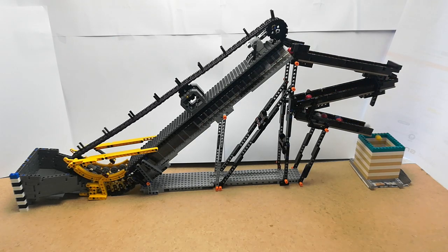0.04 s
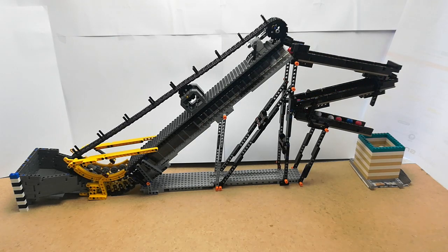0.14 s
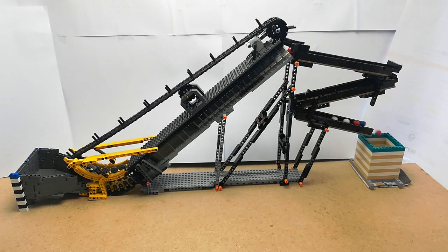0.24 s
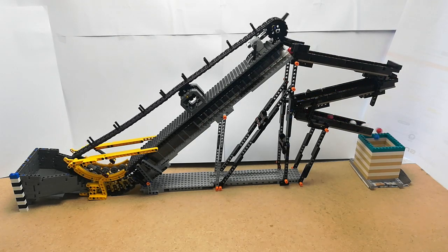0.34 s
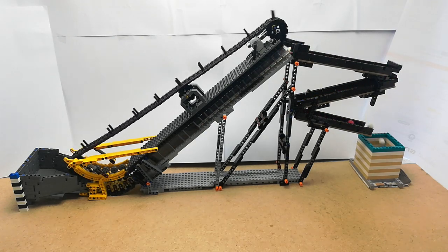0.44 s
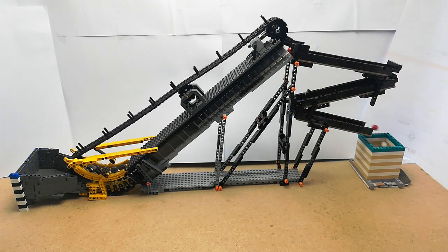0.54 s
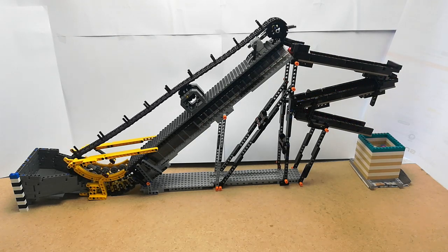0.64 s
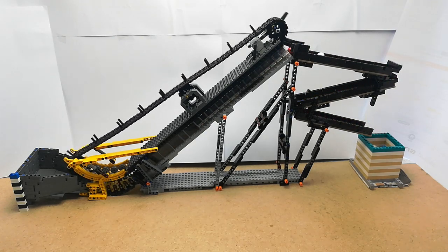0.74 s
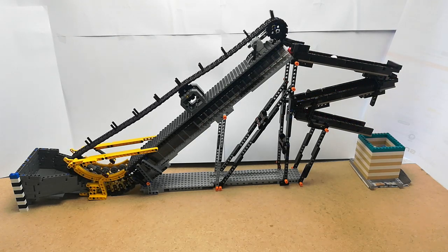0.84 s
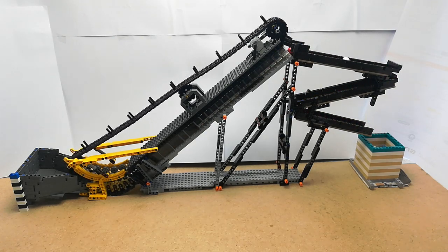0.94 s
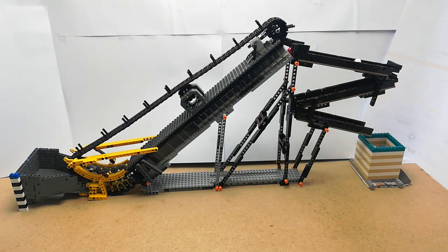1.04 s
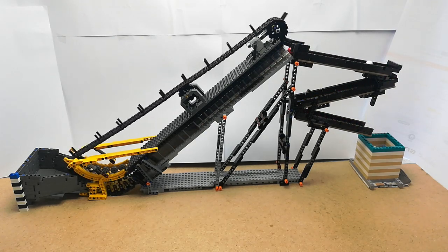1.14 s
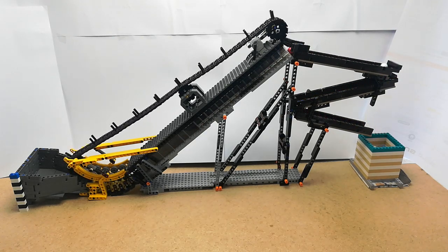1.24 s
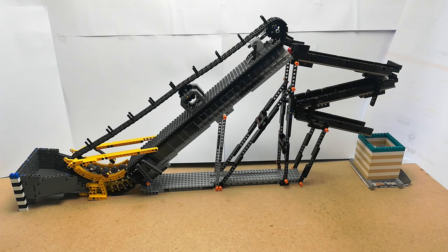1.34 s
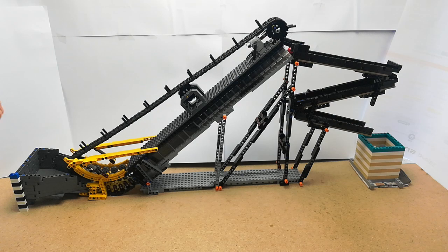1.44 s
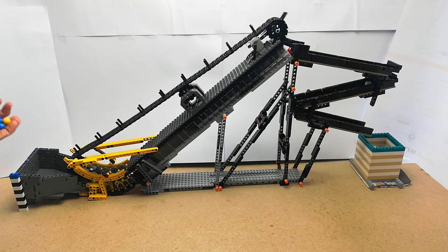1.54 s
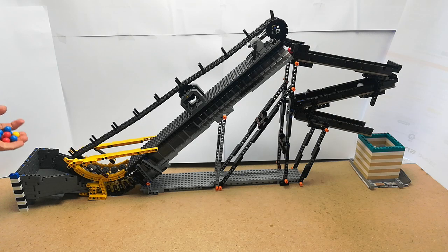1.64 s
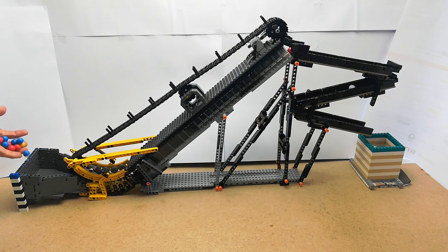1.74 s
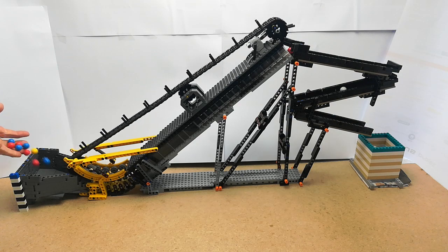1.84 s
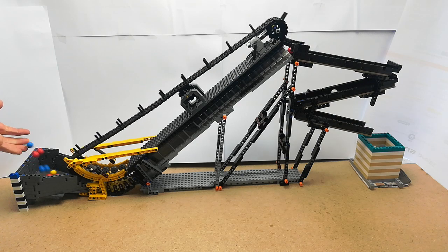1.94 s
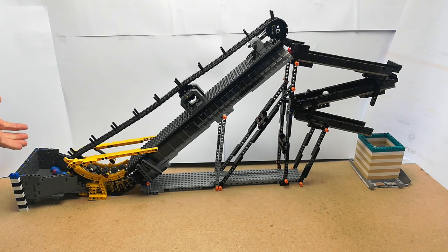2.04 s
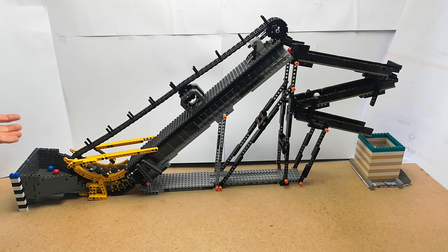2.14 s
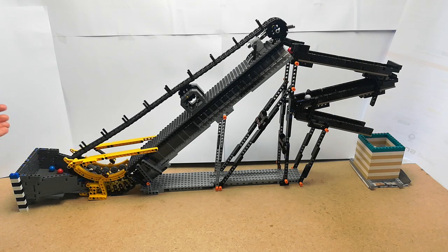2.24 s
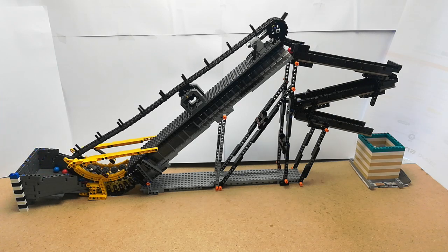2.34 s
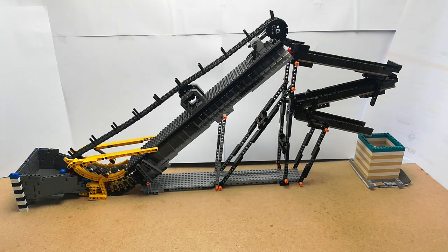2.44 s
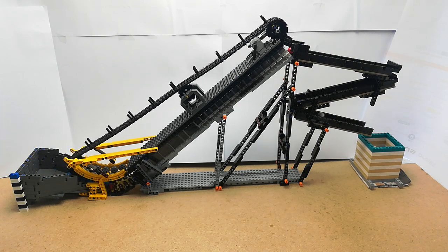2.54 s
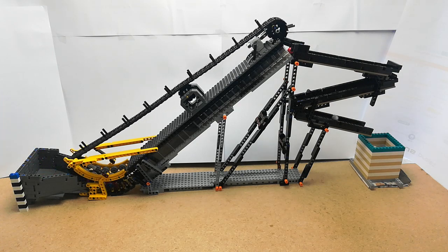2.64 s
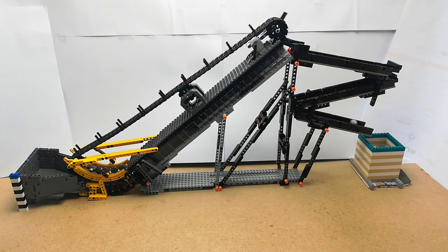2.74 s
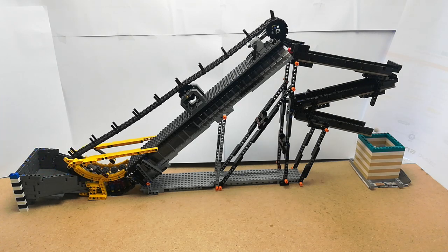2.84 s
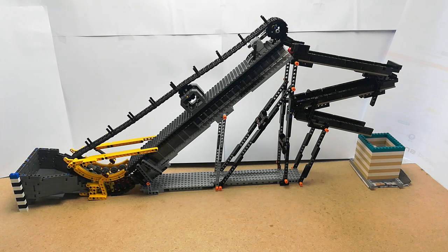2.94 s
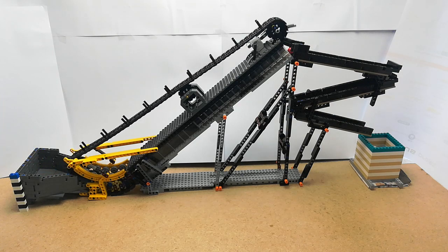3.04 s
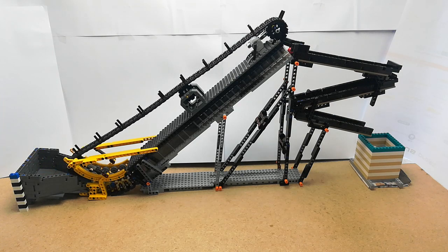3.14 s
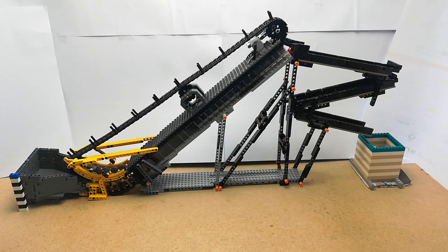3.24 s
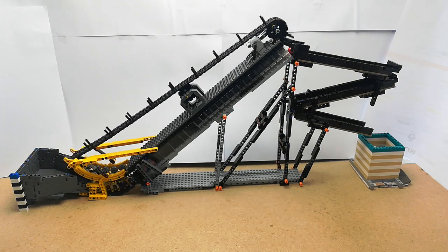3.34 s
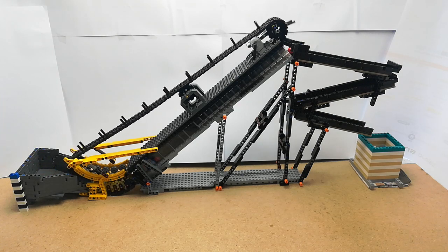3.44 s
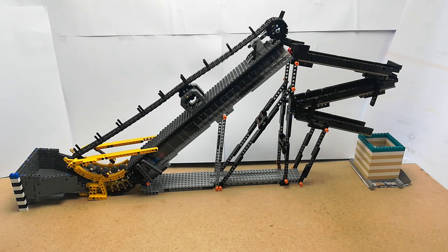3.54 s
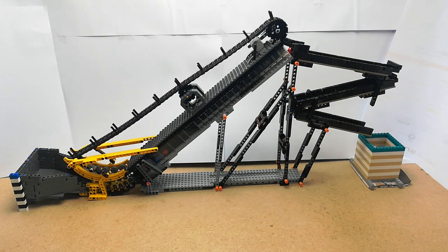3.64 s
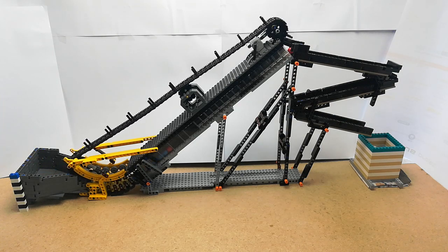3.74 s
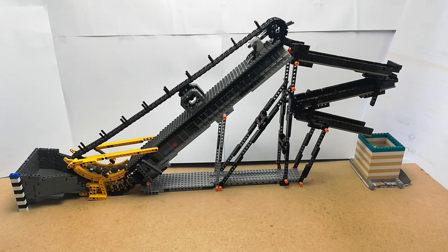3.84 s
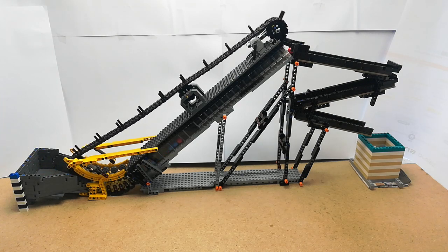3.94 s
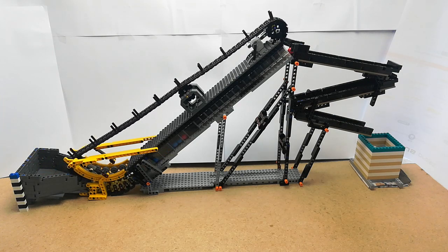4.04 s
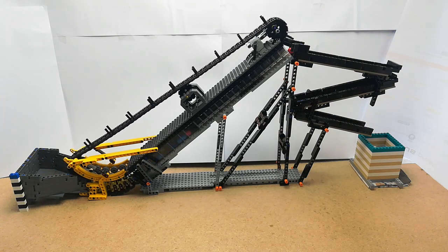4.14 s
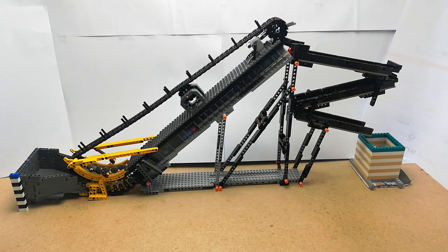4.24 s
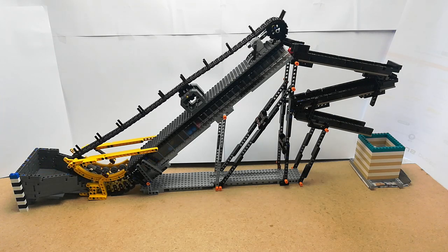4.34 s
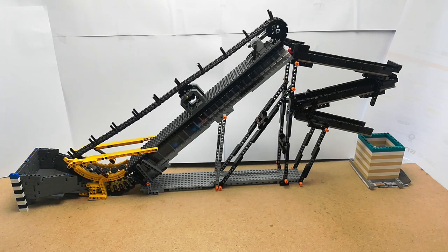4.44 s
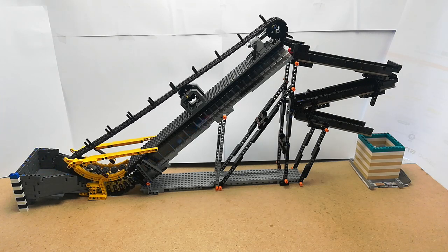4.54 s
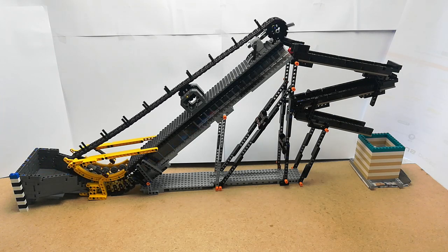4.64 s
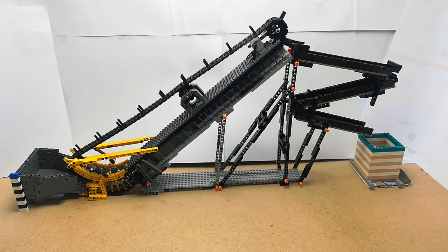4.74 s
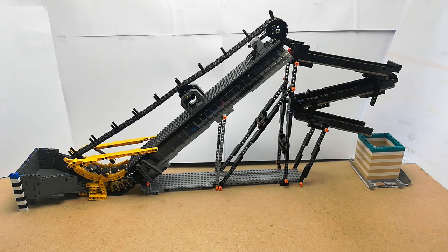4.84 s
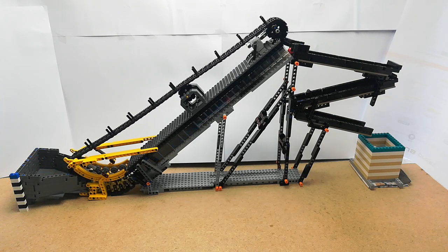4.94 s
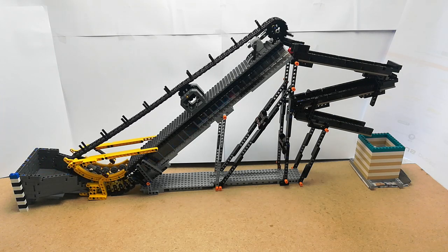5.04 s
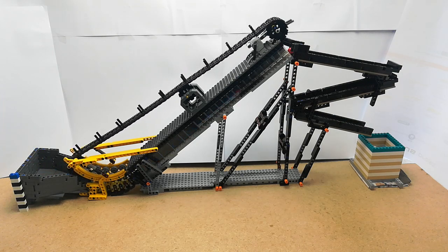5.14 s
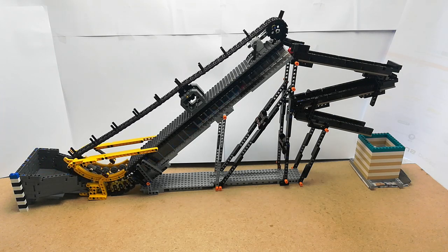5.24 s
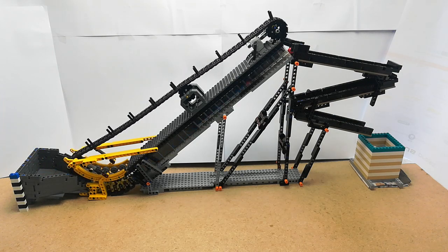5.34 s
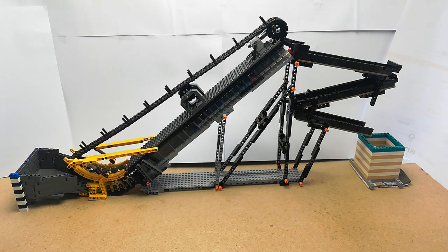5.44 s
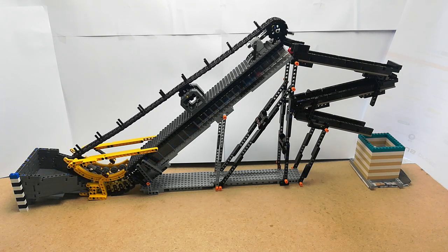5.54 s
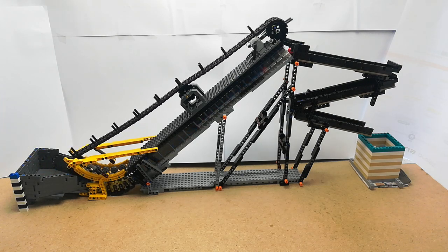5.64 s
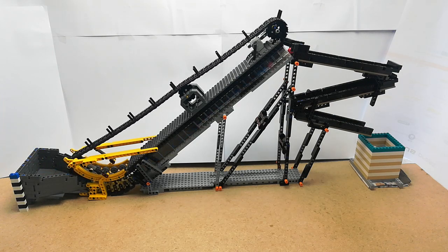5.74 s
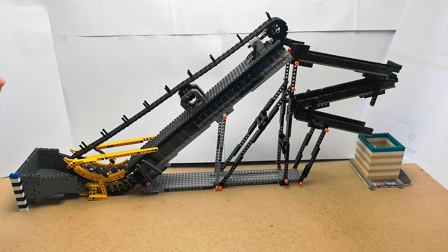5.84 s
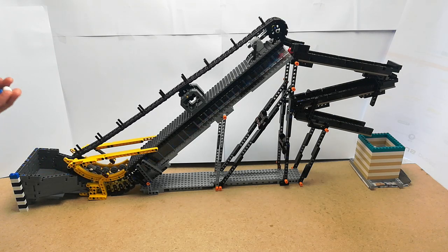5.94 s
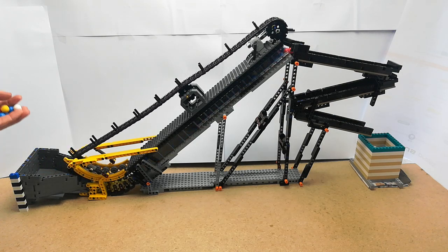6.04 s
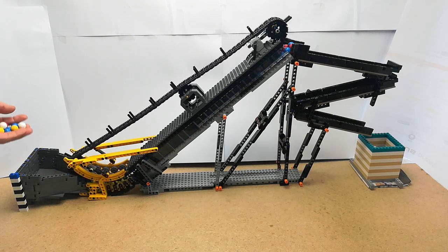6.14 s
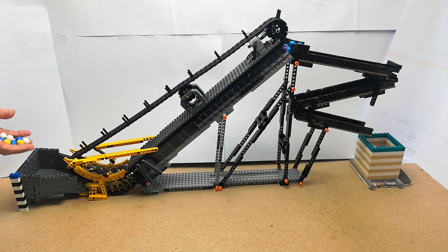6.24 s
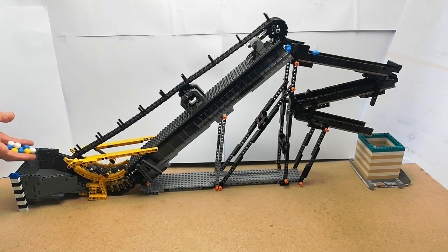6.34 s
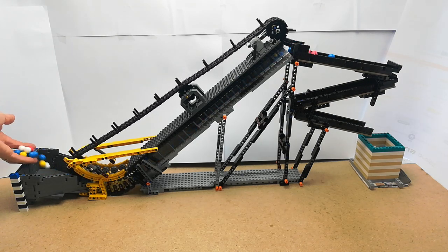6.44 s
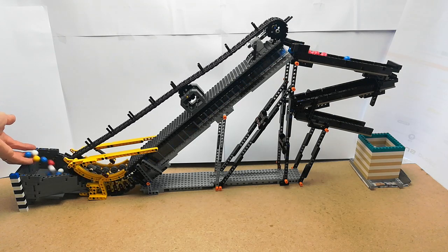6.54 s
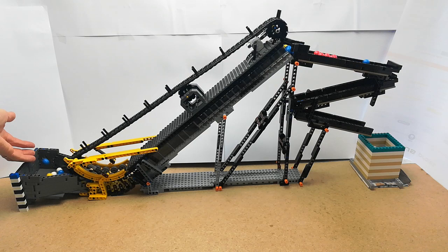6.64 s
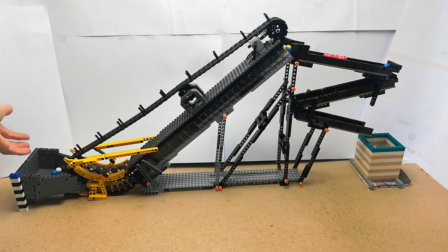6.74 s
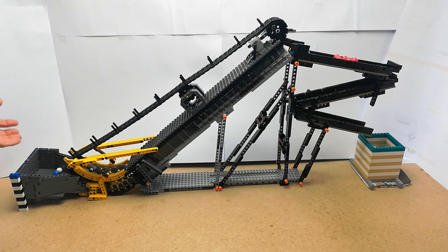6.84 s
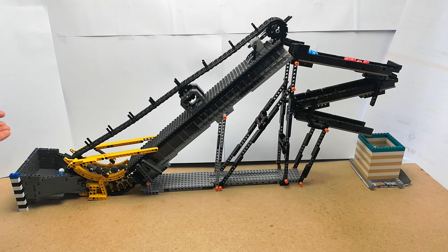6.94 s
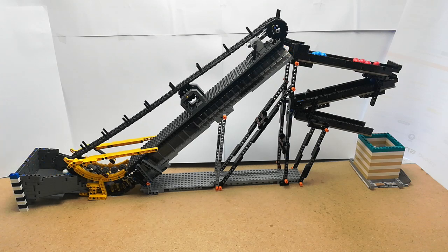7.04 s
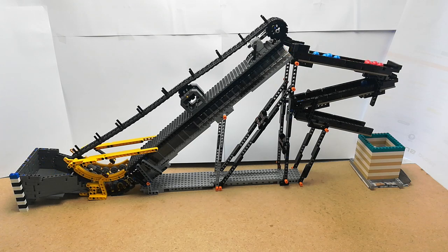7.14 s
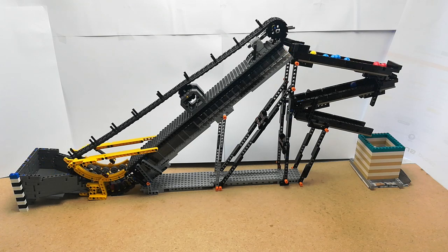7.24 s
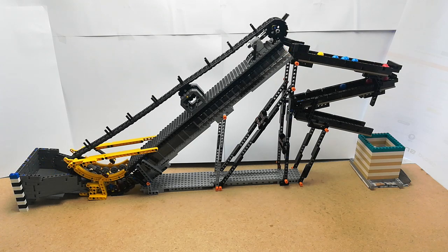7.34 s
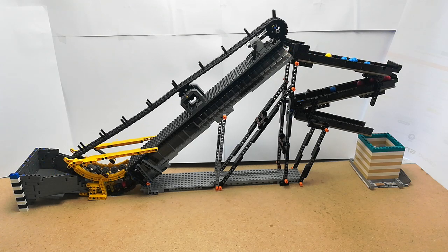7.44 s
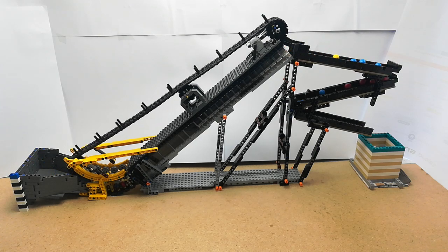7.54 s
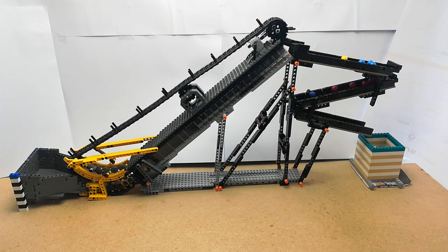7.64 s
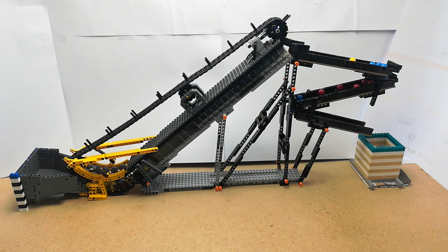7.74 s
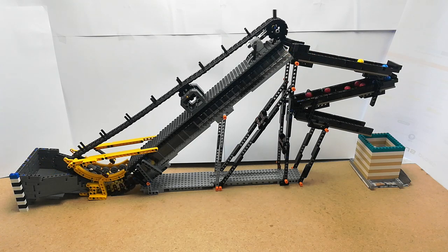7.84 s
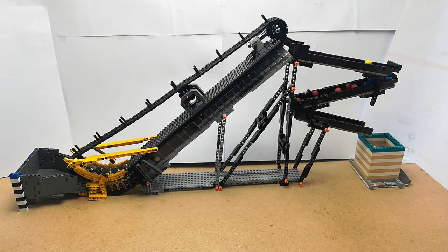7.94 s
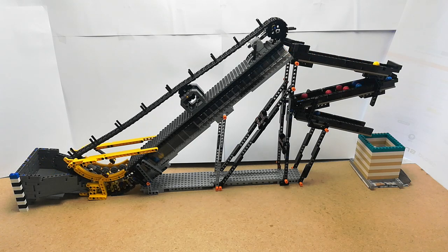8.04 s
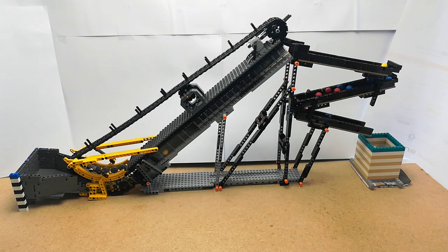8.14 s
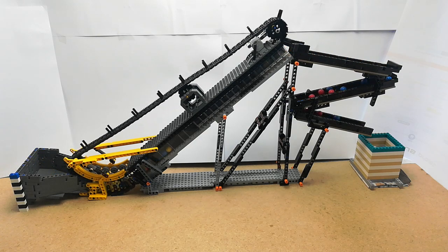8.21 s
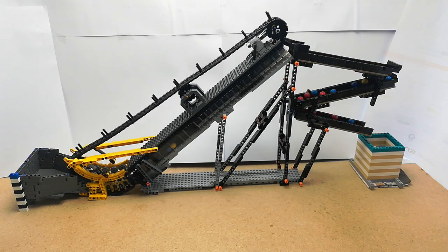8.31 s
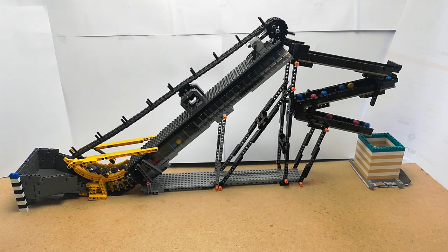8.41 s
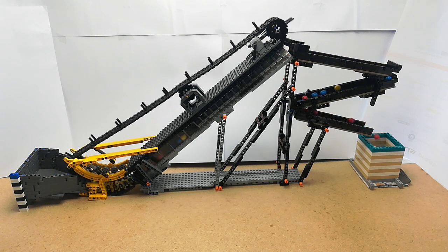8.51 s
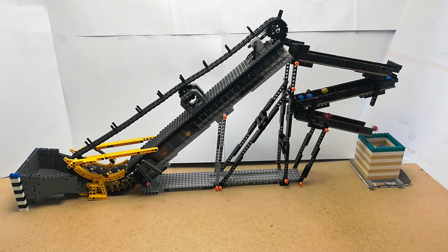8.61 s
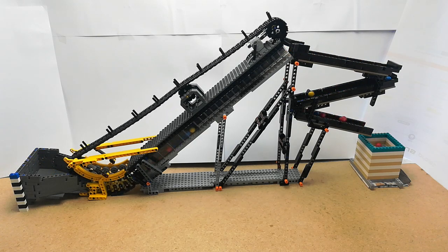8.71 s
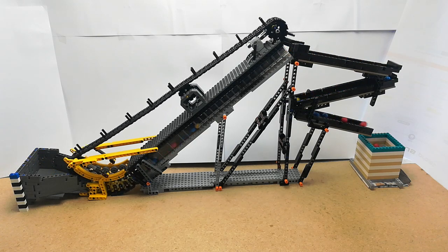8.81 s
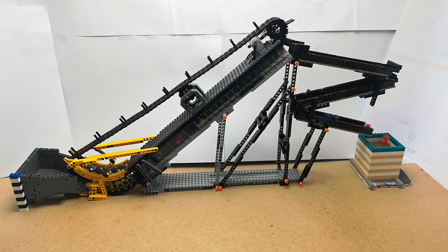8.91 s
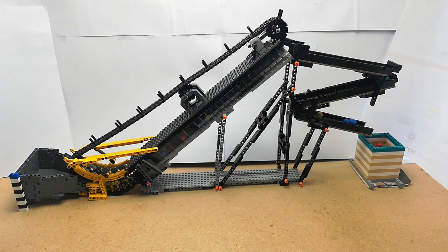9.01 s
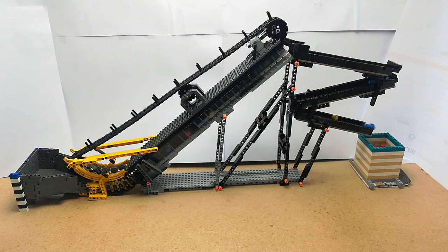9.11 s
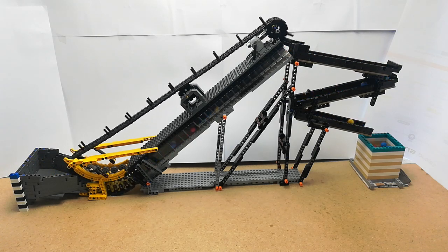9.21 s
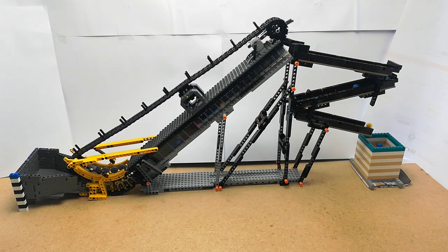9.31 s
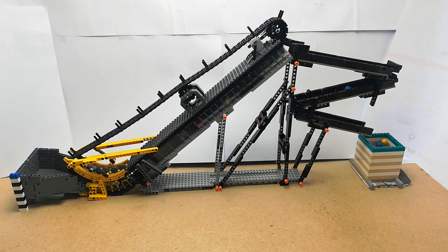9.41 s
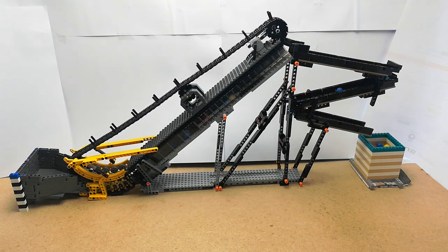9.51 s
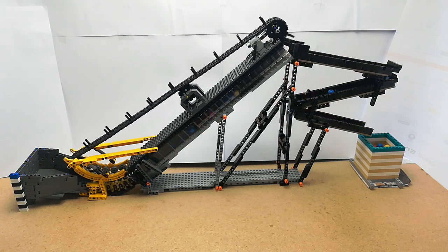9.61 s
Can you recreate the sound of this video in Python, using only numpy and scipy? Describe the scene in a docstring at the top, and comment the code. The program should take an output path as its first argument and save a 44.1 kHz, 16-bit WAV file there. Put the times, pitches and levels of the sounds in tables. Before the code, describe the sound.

A toy chain lift rattles evenly while hard plastic balls pour into a hopper and click down plastic ramps.

```python
"""A small bare corner, where hard plastic balls knock, bounce and roll on a toy machine of hollow bricks.
Impacts radiate clicks and excite the damped modes of beams, bricks and a hopper; some add a hollow thump.
Rolling balls and a motor-driven chain lift make dense trains of tiny impacts: a rumble and a fine rattle.
The walls reflect every click; a phone with two close ports listens a metre away over a low room hum."""
import sys
import numpy as np
from scipy import signal
from scipy.fft import rfft, irfft, next_fast_len
from scipy.io import wavfile
from scipy.ndimage import uniform_filter1d

SR = 44100
rng = np.random.default_rng(int(sys.argv[2]) if len(sys.argv) > 2 else 0)


def file_out(sig):
    """Save sig as 16-bit WAV at sys.argv[1]."""
    # one column per channel
    cols = np.atleast_2d(sig).T
    # limit, then scale
    lim = np.clip(cols, -1, 1)
    pcm = np.round(lim * 32767).astype(np.int16)
    wavfile.write(sys.argv[1], SR, pcm)


N = 426447
BLOW_T = np.arange(3072) / SR  # time axis of one impact in seconds

# Spectra of the room rumble, the chain, a ball's click and the side gain of the port pair.
# Each row: frequency in Hz, relative level in dB.
HUM_SPECTRUM = [(12, -29), (20, -19), (54, 4), (75, -26), (98, 8.5), (151, -9.5), (215, 1), (248, -14.5),
                (305, 4.5), (341, -26.5), (476, 1), (524, -65), (709, -7.5), (900, -3.5), (1170, -39),
                (1980, -120)]
CHAIN_SPECTRUM = [(350, -48), (600, -28.5), (661, -14.5), (894, -36), (970, 1), (1260, -8.5), (1470, -13),
                  (1700, -2), (2070, -13.5), (2720, -9), (3040, -14.5), (3890, -15), (5400, -12),
                  (7210, -1), (7940, -8), (16000, -44)]
CLICK_SPECTRUM = [(880, -6.5), (1500, -20.5), (1690, -9.5), (1940, -12.5), (2740, -11.5), (3250, -8),
                  (5020, -2.5), (5440, -3), (6760, 3), (9650, -13.5), (16000, -42.5)]
SIDE_GAIN = [(60, -20), (190, -9.5), (300, -2.5), (700, 6), (1290, -5.5), (2400, 0), (8000, 0.5)]
# Resonances of the table top and the machine. Each row: frequency in Hz, bandwidth in Hz, level in dB.
TABLE_MODES = [(116, 34, -68), (145.6, 27.4, -61.5)]
BEAM_MODES = [(2126, 1130, 9), (2420, 94, 7), (2840, 270, 6.5), (3310, 190, 2.5), (3620, 70, -4.5),
              (4630, 63, -1.5)]
BRICK_MODES = [(1060, 95, -9), (1392, 250, 5), (1471, 110, 1), (1699, 55, -5), (1370, 670, -15)]
FRAME_MODES = [(200, 96, 2.5), (303, 58, -1.5), (472, 38, -3)]
HOPPER_MODES = [(1070, 470, -9), (1343, 126, 4), (2120, 100, -8)]
# Modes of one thin clink. Each row: frequency in Hz, relative level in dB, decay time in seconds.
CLINK_MODES = [(4468, 0, .2), (5561, -12, .2), (6508, 1, .16), (6750, 0, .1), (7515, -7, .2)]
# Strength of the rolling. Each row: time in seconds, relative levels of balls, beams and bricks in dB.
ROLL_LEVELS = [(0, -21, -27.5, -21.5), (.09, -30, -40.5, -48), (.4, -28.5, -35, -36), (.65, -42, -36, -50),
               (.85, -40, -42, -53), (1.2, -43, -50.5, -49), (1.56, -39, -37.5, -47),
               (1.88, -43, -41.5, -49), (1.9, -44, -35, -42), (2.05, -72, -23, -66),
               (2.34, -29, -38.5, -36.5), (2.56, -39, -41, -44), (2.8, -36, -41.5, -40.5),
               (3.05, -37.5, -46.5, -40), (3.31, -39, -39.5, -29), (3.41, -36, -44, -62),
               (3.45, -48, -42, -45), (3.6, -37, -47, -49), (3.66, -42, -42.5, -35), (3.8, -41, -36, -34.5),
               (3.92, -45, -55, -35.5), (4.04, -38, -47.5, -44), (5.1, -40, -46.5, -37),
               (6.1, -39.5, -46, -36), (6.41, -25, -30.5, -37.5), (6.52, -25, -30.5, -31),
               (6.55, -29, -23.5, -26), (6.72, -22, -26, -30), (6.89, -26, -38, -44),
               (7.2, -26.5, -37.5, -41.5), (7.81, -26.5, -38, -38), (7.95, -25, -33, -44),
               (8.5, -25.5, -34.5, -41), (9.0, -26, -35, -42), (9.3, -33, -37.5, -40),
               (9.67, -36.5, -40, -37)]
# Where most balls are. Each row: time in seconds, nearest beam's pitch in Hz, leftward bias in dB.
ROLL_PATH = [(0, 3000, 0), (1.7, 3230, -8), (2.3, 3460, -2), (2.6, 2830, 0.5), (3.8, 2350, 3),
             (5.3, 2310, 1.5), (6.4, 2490, 0), (6.65, 3330, 0.5), (6.95, 2510, -2), (8.4, 2600, -1),
             (9.67, 2900, -3.5)]
# Balls strike the brick walls at the ramp ends.
# Each row: start in seconds, relative click and brick levels in dB, pitch of the beam behind in Hz.
WALL_HITS = [(0.0455, -16, -31, 3250), (0.2086, -19, -26.5, 3680), (0.3673, -17, -28.5, 2450),
             (.4558, -15, -24, 2900), (.497, -12, -23, 2900), (.5453, -12.5, -20.5, 2970),
             (0.571, -32, -25.5, 2870), (0.6289, -15, -22.5, 3650), (0.6877, -12.5, -22.5, 3000),
             (0.9073, -23, -30, 2370), (0.9223, -31.5, -18, 2270), (.9553, -20, -25, 2250),
             (1.2765, -23, -30, 2250), (2.9627, -18, -21.5, 3350), (2.978, -26, -22.5, 3980),
             (2.9917, -20, -22, 2950), (3.032, -36, -31.5, 3200), (3.073, -39, -35, 2800),
             (3.205, -23, -24.5, 2660), (3.2621, -31, -27, 2230), (3.3087, -37, -27, 2860),
             (3.34, -38, -29, 2320), (3.4901, -32, -23, 2720), (3.536, -36, -25, 2850),
             (8.5856, -12, -23.5, 2960), (8.6165, -11.5, -21, 2530), (8.7378, -12, -21.5, 3300),
             (8.8559, -14.5, -31, 3500), (8.987, -13.5, -22.5, 3380), (9.0125, -13, -19, 3320),
             (9.0913, -16, -18.5, 3080), (9.265, -15, -19, 3430), (9.2815, -11, -23, 2630),
             (9.3142, -19, -21.5, 3200), (9.4537, -14.5, -21, 3430), (9.629, -22.5, -31, 2420)]
# Sharp ball clacks with a low hollow thump, to the right.
# Each row: start in seconds, relative click and thump levels in dB.
HOLLOW_CLACKS = [(.0814, -2, -55), (0.2573, 1.5, -28), (0.7572, -0.5, -46), (1.062, -18, -62),
                 (1.1023, -2, -38), (1.3529, -4, -37), (1.404, -13, -48), (1.466, -18, -67),
                 (1.5444, -5, -42), (1.5977, -18, -54), (1.6404, -21, -49), (1.681, -19.5, -51),
                 (1.762, -18.5, -51), (9.0797, -11, -62), (9.2564, -12.5, -54)]
# Balls pour into the hopper. Each row: start in seconds, relative click, beam and wall levels in dB.
HOPPER_HITS = [(1.8418, -18, -34.5, -35), (1.891, -8.5, -23.5, -8), (1.9565, -5, -18.5, -10.5),
               (1.9847, -14, -27, -36), (1.9951, -8.5, -27, -10.5), (2.0341, -8.5, -30.5, -11),
               (2.073, -19, -20, -14.5), (2.099, -12, -27, -28), (2.1212, -14, -22.5, -18),
               (2.1517, -21, -29.5, -23), (2.1812, -14.5, -31, -26), (2.2328, -19.5, -39, -36),
               (2.3085, -41, -27, -25), (6.535, -12, -24, -12), (6.5582, -6.5, -26, -26),
               (6.5818, -20, -28, -29), (6.607, -13, -30, -40), (6.6225, -14, -19.5, -20),
               (6.64, -12, -21, -16), (6.6956, -11, -24, -12), (6.7292, -27, -26.5, -28),
               (6.7535, -14, -25.5, -17), (6.7882, -12, -31, -33)]
# Balls hop or collide on a ramp. Each row: start in seconds, relative click and beam levels in dB.
RAMP_HITS = [(2.469, -7.5, -29.5), (2.5357, -18, -32), (2.59, -16.5, -43), (2.6369, -19, -41),
             (2.7317, -21, -41), (2.798, -15, -39), (6.1619, -27, -31), (6.2481, -32, -24),
             (6.3113, -14, -26), (6.4682, -10, -33), (6.817, -12, -36), (6.8678, -4, -27),
             (7.1097, -14, -34), (7.249, -8.5, -33), (7.358, -12, -47), (7.3896, -9, -49),
             (7.438, -11.5, -46), (7.4666, -14, -52), (7.4932, -6.5, -36), (7.6186, -11.5, -34),
             (7.7264, -9, -34), (7.779, -12, -35), (7.8432, -13, -38), (7.913, -11.5, -36),
             (7.953, -10, -36), (8.002, -10.5, -31), (8.1274, -13.5, -34), (8.292, -9, -34),
             (8.3643, -9, -42), (8.518, -21, -45), (8.6665, -25, -26.5), (8.7091, -14, -41),
             (8.7694, -12, -40), (9.0338, -15, -38)]
# Balls tumble through the feeder onto the lift.
# Each row: start in seconds, relative click and beam levels in dB, beam pitch in Hz.
FEEDER_HITS = [(3.432, -20, -24, 2440), (3.449, -35, -28, 3750), (3.4595, -32, -23, 2300),
               (3.475, -30, -23.5, 2060), (3.5192, -32, -25.5, 2580), (3.5626, -41, -27, 2340),
               (3.5886, -36, -32, 2120), (3.5969, -23, -25, 2050), (3.6096, -31, -31, 2130),
               (3.719, -26, -27.5, 2100), (3.7423, -20, -27.5, 2550), (3.7624, -37, -28, 2070),
               (3.788, -42, -26.5, 3550), (3.8084, -33, -24.5, 1990), (3.82, -24, -23, 2280),
               (3.8344, -29, -32, 2160), (3.8622, -35, -32, 2060), (3.907, -23, -25.5, 2700),
               (4.1828, -40, -35.5, 2330), (4.2006, -18, -32.5, 2070), (4.324, -37, -39, 2100),
               (4.345, -31, -47, 2460), (4.677, -31, -34, 2180), (4.916, -27, -28, 2170),
               (4.9747, -33, -32, 2080), (4.995, -34, -33.5, 2140), (5.0471, -30, -28.5, 2080),
               (5.136, -35, -28.5, 2070), (5.182, -55, -30.5, 2200), (5.2667, -29, -30.5, 2480),
               (5.356, -33, -35, 2260)]
# Places of impact. Each row: leftward bias in dB, echo gain in dB, slap gain on the click level in dB,
# chatter time constant in ms, fractional spread of the beam pitch.
AT_WALL = (-0.64, -0.13, -38, 8, .025)
AT_RIGHT = (-4.5, -0.5, -52, 3, 0)
AT_HOPPER = (0.6, -1, -21, 2.2, .085)
AT_RAMP = (-1.5, -4, -50, 3.1, .05)
AT_FEEDER = (4, -6.5, -36, 2.7, .025)

THUMP_HZ, FEEDER_HZ = 266, 455  # thump under the clacks; air and walls of hopper and feeder
HOPPER_BEAM_HZ, RAMP_BEAM_HZ = 3570, 2640
MAINS_HZ, TOP_HZ, SILENT_DB = 48.5, 15700, -120
CORNER_T60_S, BACK_WALL_S, BACK_WALL_DB, TAIL_SAMPLES = 0.25, 0.00855, -2, 9000
CLICK_ECHO_DB, RING_ECHO_DB, ROLL_ECHO_DB = 13, 6.5, 7  # thin walls reflect clicks better than low rings


def undb(db):
    """Amplitude grows tenfold for every 20 dB."""
    return 10 ** (np.asarray(db) / 20)


def level(x, db=0):
    """Scaling sets the RMS level in dB."""
    return x * undb(db) / np.sqrt(np.mean(x ** 2))


def response(spectrum, size=1024):
    """Folding the cepstrum gives the minimum-phase impulse response of a spectrum."""
    hz, db = np.transpose(spectrum)
    bins = np.maximum(np.arange(size + 1) * SR / 2 / size, 1)
    cepstrum = irfft(np.log(undb(np.interp(np.log(bins), np.log(hz), db))))
    cepstrum[1:size] *= 2
    cepstrum[size + 1:] = 0
    return irfft(np.exp(rfft(cepstrum)))[:size]


def resonate(x, modes):
    """Superposition: a driven body responds with the sum of its resonances."""
    return sum(undb(db) * signal.lfilter(*signal.iirpeak(hz, hz / width, SR), x)
               for hz, width, db in modes)


def radiate(x):
    """Parts smaller than the wavelength radiate poorly, so the bass falls away."""
    return signal.sosfilt(signal.butter(4, 900, "high", fs=SR, output="sos"), x)


def impacts(per_s, scatter_db):
    """A Poisson process of tiny impacts, a few harder than the rest."""
    hit, size, sign = rng.random((3, N))
    return (hit < per_s / SR) * undb(-scatter_db * np.log(1 - size)) * np.sign(sign - .5)


def wander(per_s):
    """Smoothing random steps gives a slow fluctuation."""
    hold = int(SR / per_s)
    steps = np.repeat(rng.standard_normal(N // hold + 1), hold)
    return 0.49 * uniform_filter1d(uniform_filter1d(steps, hold), hold)[:N]


def add_in_corner(out, start, direct, echoed, pan_db):
    """Direct sound is followed by a back-wall reflection and a diffuse, exponentially fading tail."""
    t = np.arange(TAIL_SAMPLES) / SR
    fade = np.exp(-np.log(1000) * t / CORNER_T60_S) * np.clip(t / 0.002, 0, 1)
    fade *= 1 + undb(BACK_WALL_DB) * np.exp(-((t - BACK_WALL_S) / 0.00085) ** 2)
    tail = rng.standard_normal((2, TAIL_SAMPLES)) * fade / np.sqrt(np.sum(fade ** 2))
    ports = signal.fftconvolve(echoed[None], tail, axes=1) * undb(np.array([[.4], [-.4]]) * pan_db)
    lag = int(np.clip(8 + 4 * pan_db, -6, 24))  # the further left, the later at the right port
    ports[0, 8:8 + len(direct)] += direct * undb(0.39 * pan_db)
    ports[1, 8 + lag:8 + lag + len(direct)] += direct * undb(-.7 * pan_db)
    out[:, start:start + ports.shape[1]] += ports


def scatter(sound, pan_db, hop=3072):
    """Echo patterns depend on position, so each overlapping piece of a moving sound gets its own."""
    out = np.zeros((2, N + SR))
    padded = np.r_[np.zeros(hop), sound, np.zeros(2 * hop)]
    for i in range(0, N + hop, hop):
        piece = padded[i:i + 2 * hop] * np.hanning(2 * hop)
        add_in_corner(out, i, piece, undb(ROLL_ECHO_DB) * piece, pan_db[min(i, N - 1)])
    return out[:, hop:hop + N]


def room_hum():
    """Forced vibration: the motor drives the table top, over building rumble and a mains tone."""
    noise = rng.standard_normal((2, N)) * undb(0.5 * wander(6.8))
    rumble = signal.fftconvolve(noise, response(HUM_SPECTRUM, size=4096)[None], axes=1)[:, :N]
    drones = sum(level(resonate(rng.standard_normal(N), [(hz, width, 0)]), db)
                 for hz, width, db in TABLE_MODES)
    mains = np.sin(2 * np.pi * MAINS_HZ * np.arange(N) / SR)
    return level(rumble, db=-60.5) + drones + level(mains, db=-75.5)


def chain_lift():
    """Shot noise: countless impacts of links and gear teeth merge into an even rattle."""
    links = np.array([impacts(per_s=6000, scatter_db=2.4) for _ in range(2)]) * undb(2.5 * wander(15))
    return level(signal.fftconvolve(links, response(CHAIN_SPECTRUM)[None], axes=1)[:, :N], db=-42)


def rolling():
    """Roughness excitation: balls trip over studs and joints, shaking beams, bricks and frame."""
    t = np.arange(N) / SR
    ball_db, beam_db, brick_db, beam_hz, pan_db = (
        np.interp(t, times, column)
        for times, *columns in (np.transpose(ROLL_LEVELS), np.transpose(ROLL_PATH)) for column in columns)
    trips = impacts(per_s=2500, scatter_db=1.1) * undb(5.5 * wander(70))
    clicks = signal.fftconvolve(trips, response(CLICK_SPECTRUM, size=256))[:N]
    sound = undb(ball_db - 12) * level(resonate(clicks, [(7400, 10800, 0)]))
    # the beams under the balls ring most, those further off less
    beams = sum(resonate(trips, [mode]) * undb(-22 * np.abs(np.log2(mode[0] / beam_hz)))
                for mode in BEAM_MODES)
    sound += undb(beam_db - 7) * level(beams)
    sound += undb(brick_db - 13) * level(resonate(trips, BRICK_MODES))
    boom = undb(beam_db - 27) * level(resonate(trips, FRAME_MODES))
    return scatter(radiate(sound), pan_db) + boom


def ball_crack(click, chatter_ms, slap_db, noise):
    """Contact chatter smears each click differently; a flat face adds a bright slap."""
    chatter = np.convolve(noise * np.exp(-BLOW_T[:len(noise)] * 1000 / chatter_ms), click)
    crack = np.pad(undb(-3.5) * chatter / np.abs(chatter).max(), (0, len(BLOW_T) - len(chatter)))
    crack[:60] += undb(slap_db) * np.diff(noise[:62], 2) * np.exp(-np.arange(60) / 20)
    return crack


def damped_mode(hz, t60, phase=0):
    """Free vibration: a struck mode builds up within a cycle and decays exponentially."""
    onset = 1 - np.exp(-BLOW_T * hz * 2)
    return np.sin(2 * np.pi * hz * BLOW_T - phase) * np.exp(-np.log(1000) * BLOW_T / t60) * onset


def beam_ring(hz, detunings):
    """A struck plastic beam rings in heavily damped, inharmonic modes."""
    partials = sum(damped_mode(hz * (ratio + .07 * detune), t60=.005)
                   for ratio, detune in zip((.8, 1.3, 1.6, 1.9), detunings))
    return damped_mode(hz, t60=.0085) + .6 * partials


def wall_ring(modes, variations):
    """A struck wall's modes decay in times inversely proportional to their bandwidths."""
    return sum(undb(db + 2 * variation) * damped_mode(hz, t60=3.2 / width)
               for (hz, width, db), variation in zip(modes, variations))


def hollow_thump(hz):
    """A low resonance and its overtone swell and decay, about a quarter cycle apart at the ports."""
    swell = np.sin(np.minimum(BLOW_T / 0.0031, 1) * np.pi / 2) ** 2
    return swell * np.array([damped_mode(hz, 0.085, phase)
                             + undb(-5.5) * damped_mode(hz * 1.95, 0.035, phase) for phase in (0, 1.7)])


def blows():
    """Mechanical coupling: the place of an impact decides which resonances share its energy."""
    for start, click, thump in HOLLOW_CLACKS:
        yield start, click, (SILENT_DB, RAMP_BEAM_HZ), (SILENT_DB, BRICK_MODES), (thump, THUMP_HZ), AT_RIGHT
    for start, click, brick, hz in WALL_HITS:
        yield start, click, (brick - 8.5, hz), (brick, BRICK_MODES), (SILENT_DB, THUMP_HZ), AT_WALL
    for start, click, beam, wall in HOPPER_HITS:
        yield (start, click, (beam, HOPPER_BEAM_HZ), (wall, HOPPER_MODES),
               (beam - 24.5, FEEDER_HZ), AT_HOPPER)
    for start, click, beam, hz in FEEDER_HITS:
        yield start, click, (beam, hz), (beam - 15, BRICK_MODES), (beam - 18, FEEDER_HZ), AT_FEEDER
    for start, click, beam in RAMP_HITS:
        yield start, click, (beam, RAMP_BEAM_HZ), (SILENT_DB, BRICK_MODES), (SILENT_DB, THUMP_HZ), AT_RAMP


def knocks():
    """Impulse excitation: each blow radiates a click and sets the parts it strikes ringing."""
    out, thumps = np.zeros((2, 2, N + SR))
    highpass = signal.butter(2, 2700, "high", fs=SR, output="sos")
    click = signal.sosfilt(highpass, response(CLICK_SPECTRUM, size=256))
    clean_click = np.pad(click / np.abs(click).max(), (0, len(BLOW_T) - len(click)))
    for start_s, ball_db, (beam_db, beam_hz), (wall_db, modes), (thump_db, thump_hz), place in blows():
        pan_db, echo_db, slap_db, chatter_ms, spread = place
        start = int(start_s * SR)
        noise, detunings, variations, shifts = np.split(rng.standard_normal(213), [200, 204, 209])
        thump_detune, beam_detune, pan_shift, thump_shift = shifts  # no two blows are alike
        crack = undb(ball_db) * ball_crack(click, chatter_ms, slap_db, noise)
        rings = undb(beam_db + 13) * beam_ring(beam_hz * (1 + spread * beam_detune), detunings)
        rings += undb(wall_db - 5.5) * wall_ring(modes, variations)
        echoed = undb(ball_db - 3.5 + CLICK_ECHO_DB) * clean_click + undb(RING_ECHO_DB) * rings
        add_in_corner(out, start, crack + rings, undb(echo_db) * echoed, pan_db + 2 * pan_shift)
        thump = hollow_thump(thump_hz * (1 + 0.075 * thump_detune))
        thumps[:, start:start + len(BLOW_T)] += undb(thump_db + 6.5 + 3 * thump_shift) * thump
    return radiate(out[:, 8:N + 8]) + thumps[:, :N]


def clink(start_s=.0814):
    """Light damping lets a few high modes ring on thinly after the first hollow clack."""
    out, t = np.zeros((2, N + SR)), np.arange(SR // 3) / SR
    ping = undb(-19) * sum(undb(db) * np.sin(2 * np.pi * hz * t) * np.exp(-np.log(1000) * t / t60)
                           for hz, db, t60 in CLINK_MODES)
    add_in_corner(out, int(start_s * SR), ping, undb(-5) * ping, pan_db=AT_RIGHT[0])
    return out[:, :N]


def scene():
    """Superposition: the pressures of all sources add at each port."""
    return knocks() + clink() + rolling() + chain_lift() + room_hum()


def record(dry):
    """Long waves reach close ports alike; the converter clips at full scale and cuts the top."""
    mid, side = (dry[0] + dry[1]) / 2, (dry[0] - dry[1]) / 2
    size = next_fast_len(N)
    hz, db = np.transpose(SIDE_GAIN)
    gain = undb(np.interp(np.log(np.arange(1, size // 2 + 2) * SR / size), np.log(hz), db))
    side = irfft(rfft(side, size) * gain, size)[:N]
    ports = np.clip([mid + side, mid - side], -1, 1)
    return signal.sosfilt(signal.ellip(10, .2, 90, TOP_HZ, fs=SR, output="sos"), ports)


dry = scene()
out = record(dry)
file_out(out)
```